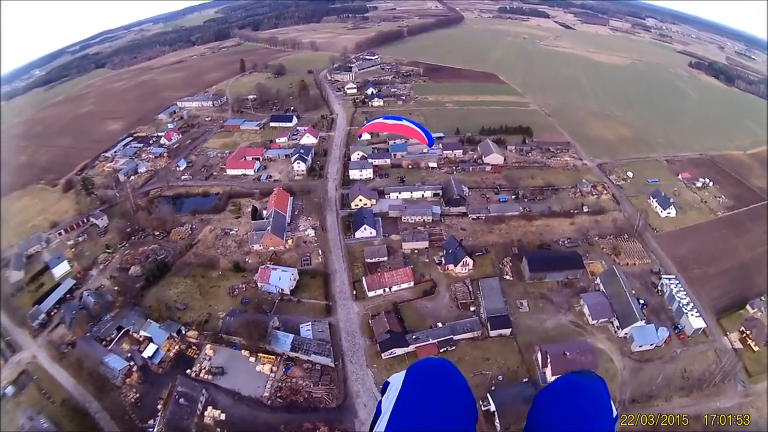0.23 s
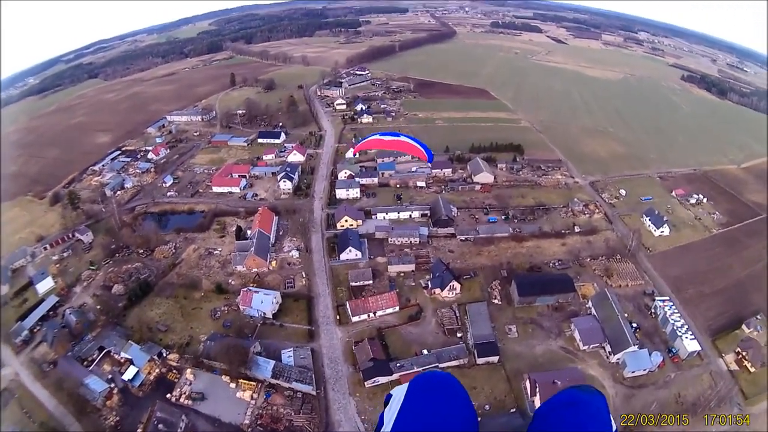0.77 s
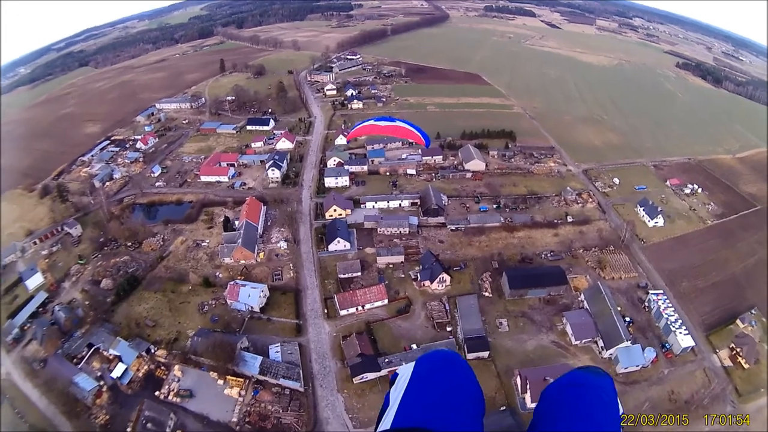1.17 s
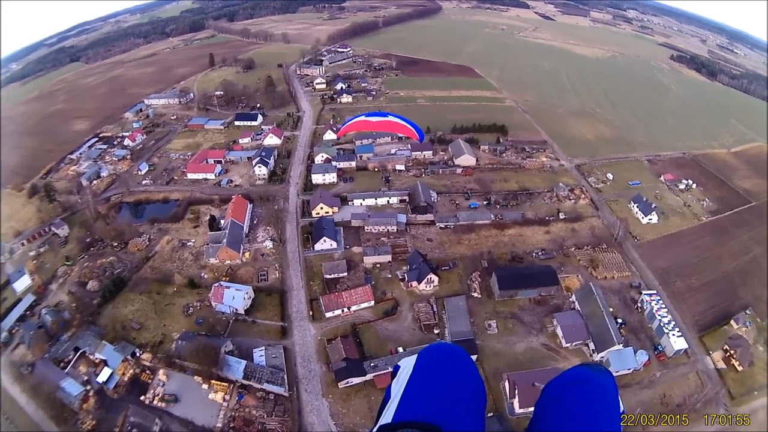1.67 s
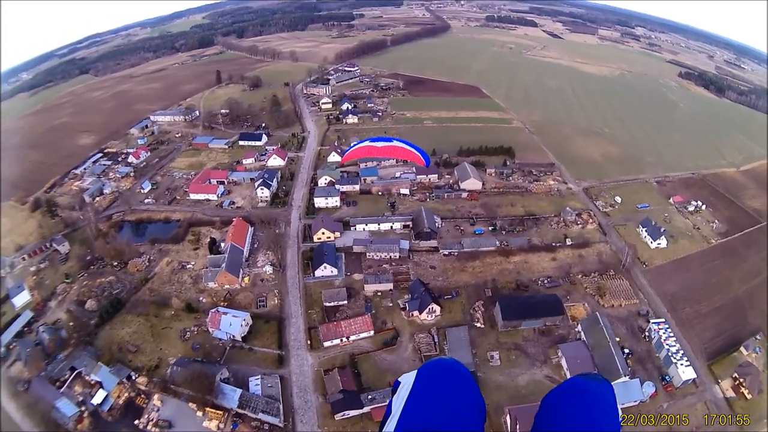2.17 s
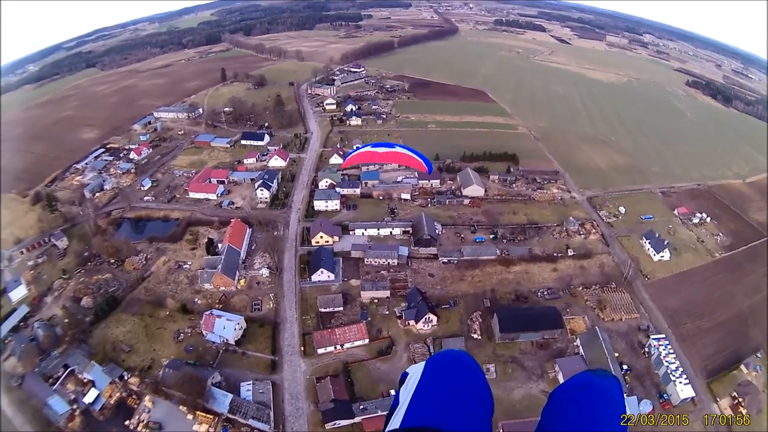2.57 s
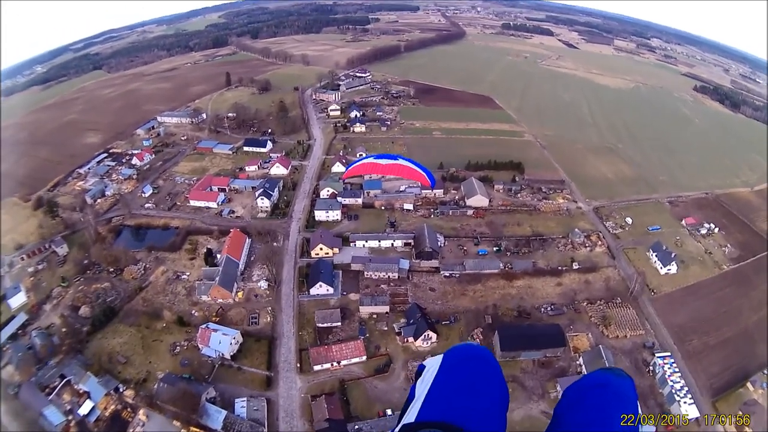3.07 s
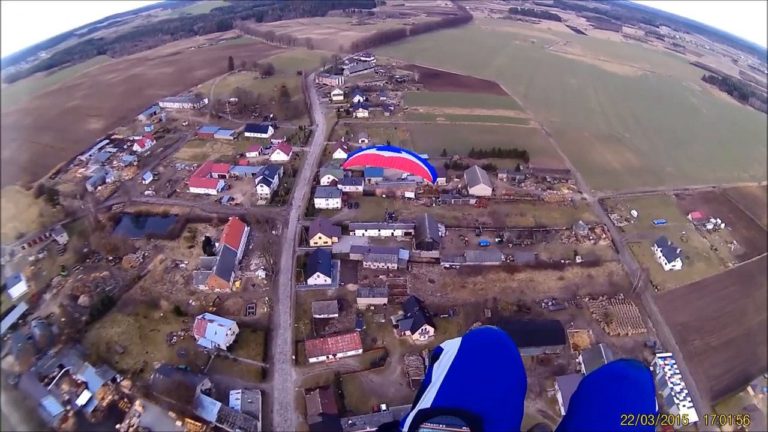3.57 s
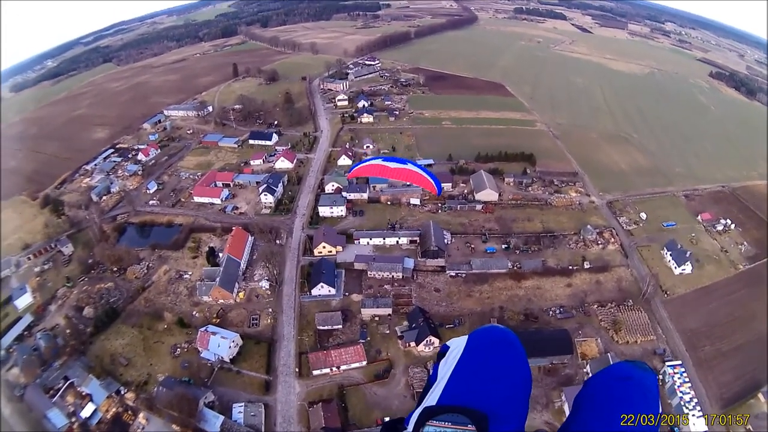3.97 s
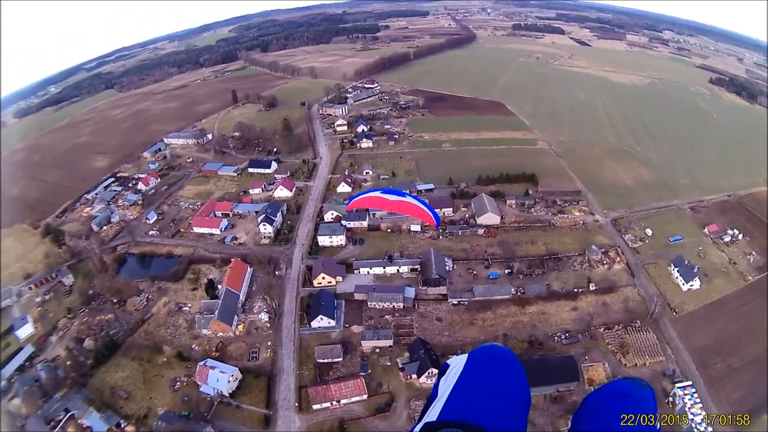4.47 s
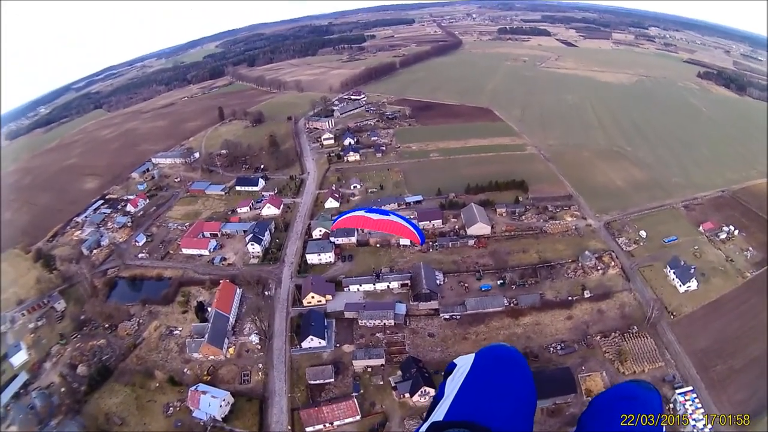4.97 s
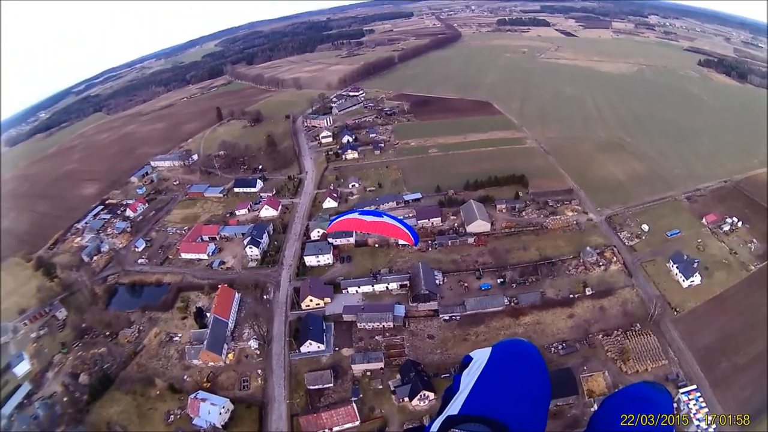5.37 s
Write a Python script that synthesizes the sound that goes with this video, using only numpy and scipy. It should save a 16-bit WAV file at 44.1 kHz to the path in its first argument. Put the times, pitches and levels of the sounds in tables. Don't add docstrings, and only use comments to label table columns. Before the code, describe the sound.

From 0 to about 5.6 seconds a paramotor flies at steady cruise, its propeller about a metre behind a small camera in a closed case on the pilot. The sound is loud, close, mono-like and dry: a hard, hollow drone with blades passing about 70 times a second and a smoother engine hum firing about 96 times a second, the two beating into a quick rough throb. Pitch barely wavers, dipping very slightly toward 3 seconds and recovering. Boxy midrange turbulence pulses with each blade, with faint thin rattling above and low wind rumble that eases gradually. Gusts thicken and distort the drone around 0.4-0.6, 0.8-0.95, 1.3, 1.9-2.2, 2.65, 3.0, 4.0 and 4.95 seconds. Brief snaps are scattered throughout, strongest near 0.46 seconds, others near 0.38, 2.96 and 5.15. The low thump swells and fades as the pilot sways. The drone continues to the end.

```python
import sys
import numpy as np
from scipy import signal
from scipy.fft import rfft, irfft, next_fast_len
from scipy.io import wavfile
from scipy.ndimage import uniform_filter1d

SR = 44100
rng = np.random.default_rng(int(sys.argv[2]) if len(sys.argv) > 2 else 0)


def invert_db(x):
    u = np.asarray(x, float) / 20
    return 10 ** u


def generate_wav(signal):
    frames = np.transpose(np.atleast_2d(signal))
    scaled = np.clip(frames, -1, 1) * 32767
    pcm = np.round(scaled).astype(np.int16)
    wavfile.write(sys.argv[1], SR, pcm)


N = 247842
TIME_S = np.arange(N) / SR

# time_s, blade_pass_hz
PROPELLER_SPEED = [(0.0, 70.08), (0.375, 70.23), (0.749, 70.59), (1.124, 70.18), (1.499, 69.9),
                   (1.873, 69.74), (2.248, 69.61), (2.623, 69.36), (2.997, 69.15), (3.372, 69.78),
                   (3.747, 70.0), (4.121, 69.84), (4.496, 69.88), (4.871, 70.17), (5.245, 70.57),
                   (5.62, 70.17)]
# time_s, blade_thump_db, firing_tone_db
SWAY = [(0, -19.5, -15.5), (.3, -15, -19), (.55, -14.5, -16.5), (.8, -14.8, -19), (1.25, -19, -18),
        (1.55, -17.5, -18), (1.95, -24.5, -17.5), (2.4, -13.5, -18), (2.85, -20.5, -17.5), (3.0, -18, -17),
        (3.3, -21, -19.5), (3.9, -22.5, -19), (4.1, -22.5, -18.5), (4.55, -17.5, -22.5),
        (4.95, -17.5, -20.5), (5.35, -20.5, -20), (5.62, -22, -21.5)]
# multiple, level_db
BLADE_TONES = [(1, 0), (2, -5), (3, -6), (4, -10), (5, -5.5), (6, -5.5), (7, -7.5), (8, -12.5), (9, -18),
               (10, -18.5), (11, -9), (12, -15), (13, -13), (14, -18.5), (15, -14.5), (16, -15.5),
               (17, -29.5), (18, -14), (19, -10), (20, -23.5), (21, -31), (22, -19.5), (23, -18),
               (24, -14.5), (25, -26), (26, -21), (27, -23.5)]
POLARITY_FLIPS = (1.5, 7.5, 12.5, 17.5)
# multiple, level_db
EXHAUST_TONES = [(1, 0), (2, -20.5), (3, -17.5), (5, -32), (6, -18), (8, -26), (9, -16), (16, -15.5)]
# centre_hz, width_hz, level_db
CASE_MODES = [(464, 353, -0.5), (883, 230, 3.5), (1306, 220, 1.5), (1536, 274, 2), (1794, 152, -1.5)]
# centre_hz, width_hz, level_db
RATTLE_MODES = [(2112, 280, 19.5), (2380, 260, 5.5), (2907, 540, 3), (3796, 660, 2), (4484, 350, -2),
                (5100, 760, -12), (5840, 780, -6), (6700, 600, -15), (7580, 680, -12), (8580, 1240, -16),
                (10460, 1230, -17.5), (12060, 1000, -24), (13500, 2000, -25.5), (15200, 1800, -25)]
# frequency_hz, density_db (per Hz)
WIND_SPECTRUM = [(15, -17), (30, -11), (45, 2.5), (60, 0), (120, -0.5), (170, -3.5), (250, -6.5),
                 (400, -9.5), (700, -9), (1500, -50), (4000, -91)]
# middle_s, half_length_s, push_db
GUST_PUSHES = [(0.403, 0.059, 2.5), (0.552, 0.084, 3), (0.818, .03, 2.5), (0.938, 0.044, 2.5),
               (1.3, .12, 1), (1.863, .06, 1.8), (2.073, 0.055, 2.8), (2.237, 0.048, 1.6), (2.648, .08, 1),
               (2.972, 0.035, 1.8), (3.17, 0.019, 0.1), (3.965, 0.027, 1.5), (4.152, 0.043, 0.8),
               (4.74, .03, -0.5), (4.95, 0.075, 2.2), (5.27, .03, 1.2)]
# time_s, snap_db
EDDY_SNAPS = [(0.205, -24), (0.379, -18), (0.4628, -11.5), (0.5392, -24), (0.607, -25), (0.8026, -29),
              (0.833, -30), (0.9028, -23), (0.9457, -21.5), (1.2306, -23), (1.4187, -24.5), (1.5339, -22),
              (1.8776, -20), (2.2934, -37), (2.536, -26.5), (2.9574, -19), (3.1896, -31), (3.96, -23),
              (4.0755, -25), (4.1899, -22), (4.4199, -25), (4.7352, -22.5), (4.7616, -25), (5.018, -21),
              (5.104, -22), (5.1467, -17), (5.261, -21), (5.3746, -22), (5.444, -20), (5.5524, -31)]

BELT_RATIO = 1.37296
BLADE_START, FIRING_START = .315, -.007
UPRIGHT_THUMP_DB = -20


def level(x, db):
    return x * invert_db(db) / np.sqrt(np.mean(x ** 2))


def tone(rms_db, phase):
    return 2 ** .5 * invert_db(rms_db) * np.cos(phase)


def curves(table):
    time_s, *columns = np.transpose(table)
    return [np.interp(TIME_S, time_s, column) for column in columns]


def walk(rate):
    hold = int(SR / rate)
    draws = rng.standard_normal(N // 200 + 2)[:N // hold + 1]
    slewed = uniform_filter1d(np.repeat(draws, hold), hold)
    return 1.46 * uniform_filter1d(slewed, hold)[:N]


def colour(x, gain):
    size = next_fast_len(N + 8192)
    hz = np.arange(size // 2 + 1) * SR / size + 1e-3
    return irfft(rfft(x, size) * gain(hz), size)[:N]


def ring(x, modes):
    def gain(f):
        power = 0
        for hz, width, db in modes:
            detuning = (f - hz * hz / f) / width / 1.785
            power = power + invert_db(db) ** 2 / (1 + detuning ** 2) ** 4
        return power ** .5
    return colour(x, gain)


def posture(thump_db):
    lean_db = thump_db - UPRIGHT_THUMP_DB
    odd_db = 2 - 7.5 * np.exp(-TIME_S / 1.43) - 0.26 * lean_db
    high_db = -0.6 * lean_db
    return odd_db, high_db


def blades(turns, thump_db):
    odd_db, high_db = posture(thump_db)
    thump_lead = .03 - .018 * TIME_S
    out = tone(thump_db + 0.81 * walk(rate=17), 2 * np.pi * (turns + thump_lead))
    swells_db = {2: 0.2 * (thump_db - UPRIGHT_THUMP_DB), 3: 0.64 * odd_db, 5: odd_db}
    for k, db in BLADE_TONES[1:]:
        sign = (-1) ** sum(k > flip for flip in POLARITY_FLIPS)
        swell_db = swells_db.get(k, 0.68 * high_db * (k > 10))
        waver_db = (0.31 + 0.097 * k) * walk(rate=8)
        slip = (.1 + .016 * k) * walk(rate=6)
        out = out + sign * invert_db(db + swell_db + waver_db - 16) * np.cos(2 * np.pi * k * turns + slip)
    return out


def engine(cycles, firing_db):
    out = 0
    for k, db in EXHAUST_TONES:
        waver_db = (-0.5 + 0.15 * k) * walk(rate=7.8)
        slip = 0.023 * k * walk(rate=11)
        out = out + tone(db + firing_db + waver_db, 2 * np.pi * (k * cycles - 0.11 * (k - 1)) + slip)
    return out


def puffs(turns, beat, depth, split, lag, scatter_db):
    pass_number = np.floor(turns - lag + 2.5).astype(int)
    strength = rng.standard_normal(N // 400)[pass_number]
    angle = 2 * np.pi * (turns - lag)
    exhaust = .18 * np.cos(2 * np.pi * (beat - .2))
    shape = depth * np.cos(angle) - split * np.cos(2 * angle) + exhaust
    return np.exp(shape) * invert_db(scatter_db * uniform_filter1d(strength, size=200))


def gusts():
    t = np.linspace(0, N / SR, num=2000)
    push_db = sum(db * np.exp(-((t - middle) / half) ** 2) for middle, half, db in GUST_PUSHES)
    return np.interp(TIME_S, t, push_db)


def snaps():
    quiet_db, early_s, decay_s = -35.5, 0.00089, 0.0042
    time_s, snap_db = np.transpose(EDDY_SNAPS)
    start = ((time_s - early_s) * SR).astype(int)
    kicks = np.bincount(start, 0.63 * (snap_db - quiet_db), minlength=N)
    decaying = signal.lfilter([1], [1, -np.exp(-1 / (decay_s * SR))], kicks)
    return uniform_filter1d(decaying, size=30)


def wake(turns, beat):
    roar_db = -17 + 0.43 * TIME_S + 0.51 * gusts() + snaps()
    gate = puffs(turns, beat, depth=0.32, split=0.28, lag=0.0059, scatter_db=1.25)
    roar = ring(gate * rng.standard_normal(N), CASE_MODES)
    rattle = ring(gate ** 0.53 * rng.standard_normal(N), RATTLE_MODES)
    return invert_db(roar_db) * level(roar, -1.48) + level(rattle, -35)


def wind(turns, beat):
    rumble_db = -33 - 1.4 * TIME_S + 3.5 * walk(rate=7)
    hz, db = np.transpose(WIND_SPECTRUM)
    gate = puffs(turns, beat, depth=0.23, split=0.019, lag=0.038, scatter_db=1.5)
    buffet = colour(gate * rng.standard_normal(N), lambda f: invert_db(np.interp(np.log(f), np.log(hz), db)))
    return invert_db(0.59 * rumble_db) * level(buffet, -1.0)


def whine():
    return 2 ** .5 * invert_db(-81) * np.sin(2 * np.pi * 10019 * TIME_S)


def scene():
    thump_db, firing_db = curves(SWAY)
    passes = np.cumsum(curves(PROPELLER_SPEED)[0]) / SR
    turns = passes + BLADE_START
    cycles = BELT_RATIO * passes + FIRING_START
    beat = cycles - turns
    motor = blades(turns, thump_db) + engine(cycles, firing_db)
    air = wake(turns, beat) + wind(turns, beat)
    return (motor + air + whine())[None]


def roll_off(x):
    return signal.sosfilt(signal.butter(12, 15800, fs=SR, output="sos"), x)


def record(dry):
    def coupling(f):
        return (1j * f + 6) / (1j * f + 39.7)
    preamp = colour(dry[0], lambda f: 1 / coupling(f))
    headroom_db = 0.2 * TIME_S - gusts() - .2 * snaps()
    clipped = np.clip(preamp, -1.1, 0.86 * invert_db(headroom_db))
    mix = np.clip(colour(clipped, coupling), -1, 1)[None]
    return roll_off(mix)


dry = scene()
out = record(dry)
generate_wav(out)
```